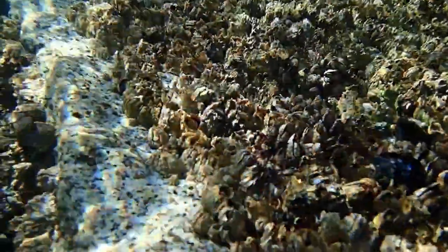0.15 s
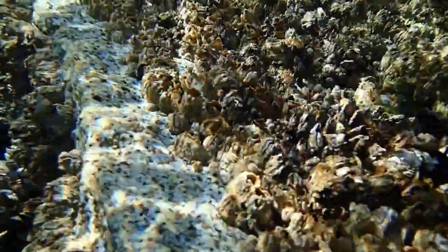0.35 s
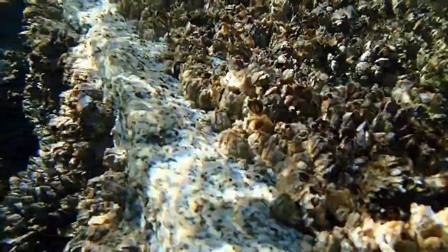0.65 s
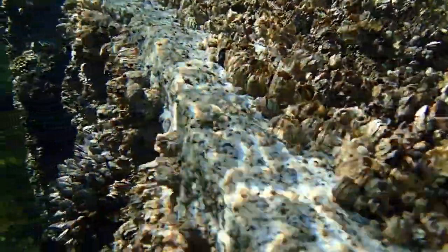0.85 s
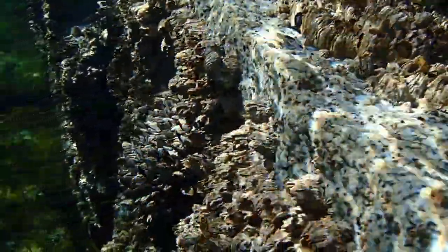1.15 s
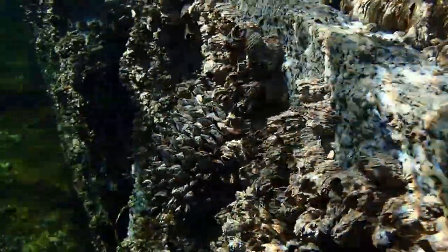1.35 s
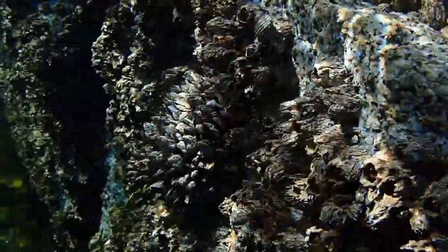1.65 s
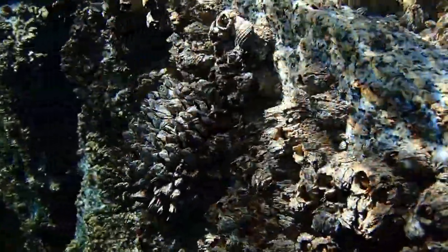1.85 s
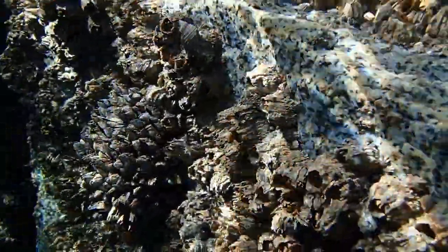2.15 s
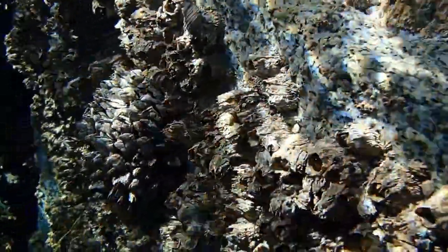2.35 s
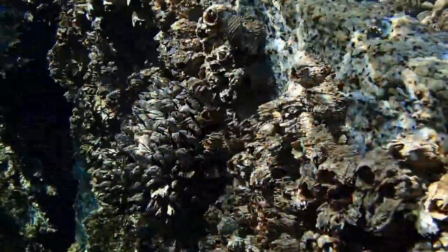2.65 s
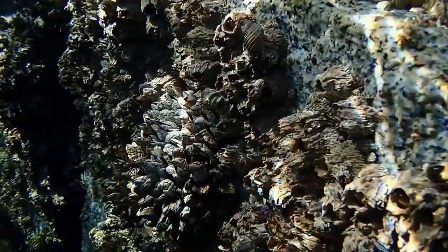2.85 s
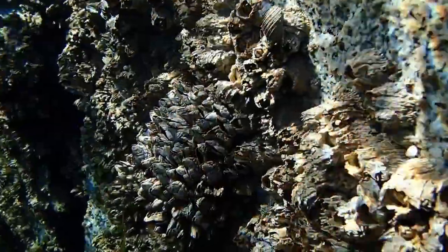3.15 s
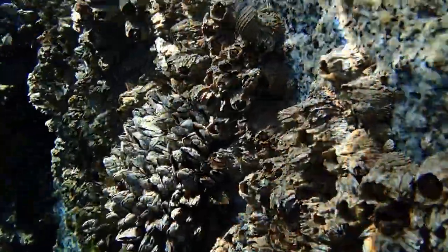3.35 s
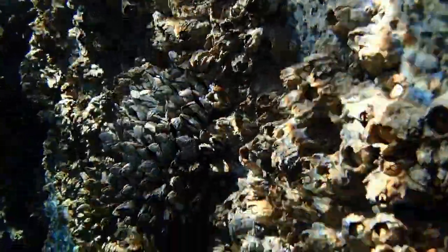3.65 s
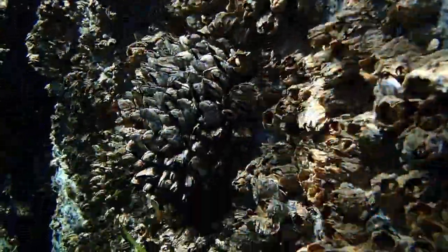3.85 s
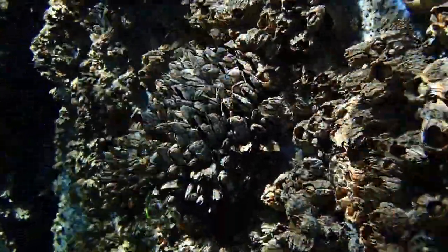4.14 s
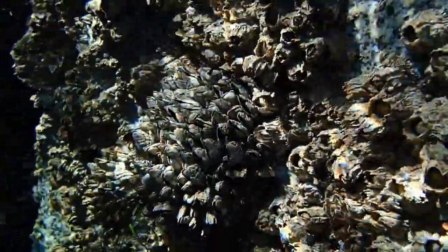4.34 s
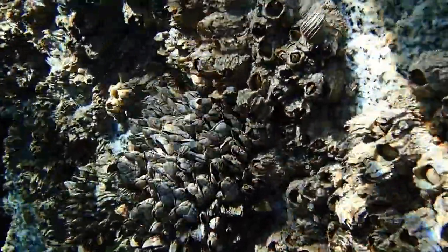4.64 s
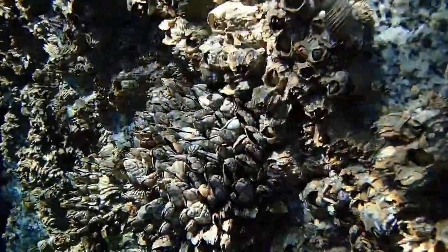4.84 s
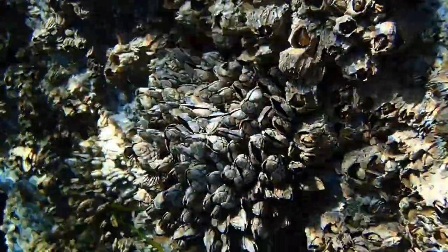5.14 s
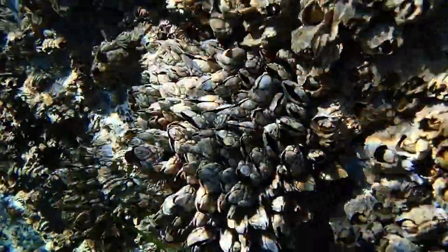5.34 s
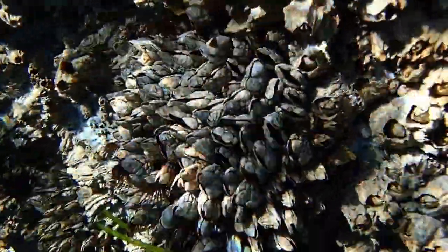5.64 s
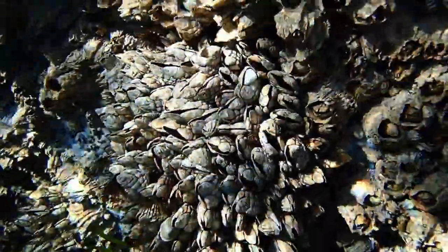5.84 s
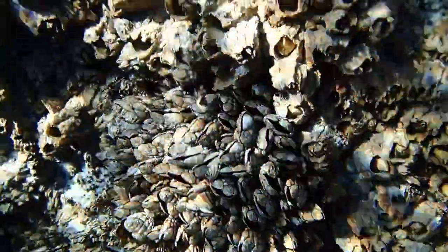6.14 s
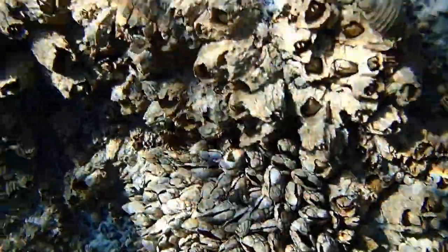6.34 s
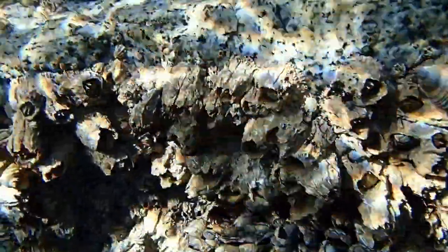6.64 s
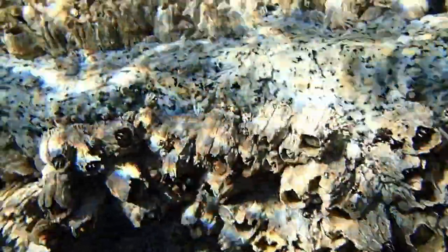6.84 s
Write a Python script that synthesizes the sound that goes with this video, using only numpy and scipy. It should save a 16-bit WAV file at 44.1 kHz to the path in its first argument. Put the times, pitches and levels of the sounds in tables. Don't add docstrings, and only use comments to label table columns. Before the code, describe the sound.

A drifting underwater camera picks up small dry clicks and dull knocks conducted through its case. The lens motor ticks evenly for the first second, joined by bubbles and a loud, crunching knock; a harsher double knock follows. Then scattered shell taps, double clicks, grit scrapes and rising bubble blips carry on over soft steady hiss, low sloshing surge and a few faint moans. Stereo, very close, muffled and dry.

```python
import sys
import numpy as np
from scipy import signal
from scipy.fft import rfft, irfft, next_fast_len
from scipy.io import wavfile
from scipy.ndimage import uniform_filter1d, map_coordinates

SR = 44100
rng = np.random.default_rng(int(sys.argv[2]) if len(sys.argv) > 2 else 0)


def wav_record(signal):
    frames = np.transpose(np.atleast_2d(signal))
    bounded = np.clip(frames, -1, 1)
    quanta = np.round(bounded * 32767).astype(np.int16)
    wavfile.write(sys.argv[1], SR, quanta)


def magnitude_from_level(level_db):
    exponent = np.asarray(level_db, float) / 20
    return 10 ** exponent


N = 308259

# freq_hz, level_db
HISS_SPECTRUM = [(30, -1), (300, 4.5), (1700, -2), (3600, -8), (4400, -9.5), (6000, -2), (9500, -6),
                 (15900, -7.5)]
# freq_hz, level_db
SLOSH_SPECTRUM = [(40, -13), (90, -5), (140, 2.5), (230, 0), (350, -2), (550, -10.5), (800, -53),
                  (1500, -22.5)]
# time_s, level_db
SURGE_LEVEL = [(0.0, -62), (0.37, -58), (0.58, -54), (1.71, -55.5), (2.22, -51.5), (2.33, -56.5),
               (2.76, -57), (3.29, -56), (3.5, -55), (3.79, -55.5), (4.3, -58.5), (4.88, -54), (5.45, -54),
               (5.94, -57), (6.64, -60.5), (6.99, -60.5)]
# time_s, pitch_hz, level_db
MOANS = [
    [(2.18, 210.3, -58), (2.306, 203.5, -45.5), (2.36, 200, -57)],
    [(4.66, 138.4, -65), (4.75, 138, -56), (5.12, 136.3, -56)],
    [(6.36, 140, -52), (6.44, 130, -71), (6.52, 129, -51)],
    [(6.78, 135.4, -59), (6.93, 130.5, -63), (7.05, 130, -64)],
]
# freq_hz, width_hz, level_db
BODY_PEAKS = [(450, 190, 1), (850, 264, 1.5), (1165, 350, 2), (2184, 200, -6), (2800, 220, -5)]
# freq_hz, width_hz, level_db
CAVITY_PEAKS = [(7530, 1070, -3.5), (8640, 430, -6)]
# freq_hz, width_hz, level_db
SERVO_PEAKS = [(1200, 280, -1.5), (2285, 120, -1), (3060, 130, 1.5), (3270, 200, -1.5), (5700, 1000, -7)]
# start_s, peak_db, pitch_hz
ROCK_SNAPS = [(1.058, -44, 7700), (1.348, -32.5, 7950), (1.385, -32.5, 7800), (1.3936, -36, 7700),
              (1.5096, -32, 8330), (1.606, -43, 7850), (1.731, -42, 5400), (1.7342, -30.5, 7900),
              (2.472, -48, 7500), (3.483, -41, 7300), (4.4762, -38, 7530), (4.8163, -40.5, 7700),
              (4.932, -43, 7500), (5.0634, -41, 7660), (5.0865, -42, 7440), (5.1005, -38, 7400),
              (5.2078, -45, 7500), (5.305, -45, 5460), (5.928, -38.5, 8100)]
# start_s, steps
FOCUS_RUNS = [
    (.0184, 4),
    (.3022, 10),
]
# freq_hz, level_db, t60_s, lag_s
CARRIAGE_MODES = [(1194, 5, 0.017, 0.00194), (1605, -1, 0.011, 0.00096), (1860, -4, 0.01, 0.00048),
                  (3310, -2, 0.013, 0.00119), (3700, 13, 0.0042, 0.0062), (4330, 4.5, 0.0058, 0.00058),
                  (5600, 7, 0.0022, 0.00045)]
WHINE_BURSTS = [(0, 1, 3), (6, 8, 10, 11), (13, 14, 16), (19, 21), (27, 28, 30, 32), (38, 40, 42),
                (44, 45, 46), (52, 54), (58, 59, 61, 63, 65), (68, 72), (75, 76), (81, 82, 84)]
# start_s, peak_db, pitch_hz
BUBBLES = [(.575, -51, 228), (0.633, -37, 385), (.66, -39, 393), (0.724, -35.5, 298), (0.968, -44, 119),
           (1.118, -45, 170), (1.356, -39, 347), (1.384, -41, 209), (1.512, -35, 424), (1.734, -33, 308),
           (2.262, -44, 167), (2.45, -55, 91), (3.352, -37.5, 274), (3.709, -42, 130), (3.527, -45.5, 214),
           (3.901, -31.5, 283), (3.987, -37, 184), (4.31, -37, 406), (4.331, -38, 395), (4.535, -39, 347),
           (4.736, -45, 317), (5.086, -40, 331), (5.342, -40, 131), (6.148, -33.5, 215),
           (6.601, -39.5, 314)]
# start_s, length_s, level_db, fizz_db
SCRAPE_STROKES = [(0.545, 0.021, -47.5, -70), (0.572, 0.023, -48, -66), (0.65, 0.064, -46.5, -72),
                  (1.118, 0.054, -49.5, -56), (1.339, 0.084, -52, -51.5), (2.459, 0.05, -42, -42.5),
                  (2.927, 0.025, -51, -69), (3.301, 0.07, -46.5, -58), (3.366, 0.058, -43, -57),
                  (3.42, 0.02, -52, -56), (3.463, 0.042, -45, -48), (4.306, 0.083, -55, -69),
                  (5.067, 0.045, -52, -53), (5.293, 0.074, -46, -56), (6.562, 0.056, -53, -64),
                  (6.693, 0.043, -50.5, -80)]
# start_s, peak_db, crack_db above the ring
SHELL_TAPS = [(0.904, -35, 0), (0.962, -35, -11), (1.2812, -24.5, -7), (1.359, -33.5, -18),
              (1.491, -45.5, 1.5), (1.5105, -32, -0.5), (1.6064, -37, -3), (1.6828, -29.5, -7.5),
              (1.7349, -25, -3), (2.5442, -36.5, -1.5), (3.4612, -36, -13), (5.9479, -35.5, -20),
              (6.5562, -43, -10)]
# start_s, peak_db, crack_db above the ring, touch_ahead_s
ROCKING_SHELLS = [(1.2512, -33.5, -23, 0.0094), (1.95, -30.5, -6, 0.0069), (2.3508, -29.5, -9.5, 0.0059),
                  (2.685, -31, -6.5, 0.0054), (2.951, -36, -11, 0.0063), (3.2858, -29.5, -10, 0.006),
                  (3.5533, -33, -11.5, 0.0083), (4.225, -27.5, -13, 0.013), (4.621, -32.5, -12, 0.0073),
                  (5.0903, -28, -15, 0.0097), (5.4897, -29, -11, 0.0097), (5.8251, -29, -16.5, .0114),
                  (6.086, -33, -14, 0.0045)]
# start_s, peak_db, pitch_hz
GRIT_TICKS = [(0.5384, -34.5, 1060), (0.681, -33.5, 1060), (1.479, -38, 905), (1.5194, -38, 1090),
              (1.8107, -37.5, 890), (2.08, -38, 1040), (2.464, -44, 1030), (2.4746, -32.5, 980),
              (2.4842, -41, 1050), (2.4989, -33, 1000), (2.75, -48, 1200), (2.879, -46, 1210),
              (2.907, -42, 1320), (3.154, -42, 1200), (3.392, -32.5, 1000), (3.412, -39, 915),
              (4.682, -44, 1330), (4.814, -51, 1140), (4.86, -47, 1310), (4.937, -41.5, 1144),
              (5.208, -49, 1070), (5.282, -44, 1220), (5.679, -47, 1140), (1.107, -48, 1160),
              (1.384, -45, 1240), (2.8119, -36, 900), (2.839, -37, 1040), (3.079, -37.5, 880),
              (3.366, -36, 830), (3.661, -50, 700), (3.6785, -36, 850), (4.4803, -36.5, 1140),
              (4.746, -35, 1130), (5.3436, -31, 920), (5.6126, -31.5, 930), (5.8153, -36, 1120),
              (6.282, -35, 960), (6.548, -32.5, 1130), (6.683, -38, 1120), (6.8829, -35.5, 1190)]
# start_s, peak_db, pitch_hz
SOFT_BUMPS = [(0.3338, -32, 496), (0.484, -35.5, 520), (.49, -36, 514), (0.804, -32.5, 530),
              (0.9664, -27, 370), (.58, -36.5, 476), (1.123, -37, 415), (1.9264, -42, 477),
              (3.05, -41.5, 420), (3.851, -47, 610), (1.98, -34.5, 524), (2.144, -31, 625),
              (2.1922, -37.5, 407), (2.2562, -30, 504), (2.4207, -35, 544), (2.5652, -38, 394),
              (2.679, -33, 377), (2.9357, -38, 380), (3.7082, -25.5, 450), (3.743, -32.5, 530),
              (3.8603, -37.5, 450), (4.025, -32, 507), (4.3458, -39.5, 445), (4.59, -33.5, 417),
              (5.3012, -37, 388), (5.9118, -32.5, 483), (6.0295, -40.5, 570), (6.1325, -37.5, 564),
              (6.6367, -33.5, 450)]
# freq_hz, level_db, t60_s
CRACK_MODES = [(1810, -0.5, 0.0098), (2010, -2, 0.028), (2720, 7, 0.0056), (3050, 5, 0.017),
               (4040, 4.5, 0.0099), (4160, 6.5, 0.0079), (5400, 5, 0.0065), (6300, -32, 0.0021),
               (7500, -10, .005)]
# start_s, case_push, wall_push (both of full scale)
KNOCK_CONTACTS = [
    (.88375, 2.69, -.77),
    (.88575, .74, -1.06),
    (.88826, .6, -.47),
    (1.61201, 1.82, -.44),
    (1.6135, -1.72, .94),
    (1.61833, .71, -.54),
    (1.63615, -.55, 1.01),
    (1.63744, -.49, -.72),
    (1.63874, 1.38, -.31),
]
# freq_hz, t60_s
CASE_MODES = [(538, .0082)]
# freq_hz, t60_s
WALL_MODES = [(600, .0143), (1077, .0212)]
GRIND_STARTS = [
    .8842,
    1.6118,
    1.6357,
]
# peak_db, hardness_db
GRINDS = [
    (-6.5, -20.5),
    (-4, -13.5),
    (-0.5, -13),
]
HOUSING_MODES = {"crack": [(1430, 1, 0.019), (2070, 5, 0.011), (3016, 4.5, 0.027), (3500, -5, 0.0051),
                 (4180, 5.5, 0.0075)], "shrill": [(5300, 8, 0.0023), (6300, -1, 0.0022),
                 (7880, 10, 0.0026)], "splinter": [(9700, 21, 0.0034), (11260, 24, 0.0081),
                 (12500, 26, 0.0034), (13700, 10, 0.003), (15700, -1, 0.0023)]}

GRIT_FOLLOWS, FIZZ_FOLLOWS = 0.7, 0.23
FRAME_S = .06672


def unit(x):
    return x / np.sqrt(np.mean(x ** 2) + 1e-20)


def filtered(x, response):
    m = next_fast_len(N + 8192)
    return irfft(rfft(x, m) * response(np.fft.rfftfreq(m, 1 / SR)), m)[..., :N]


def colour(points):
    f, db = np.transpose(points)
    return lambda hz: magnitude_from_level(np.interp(np.log(hz + 1), np.log(f), db))


def resonances(modes):
    def response(f):
        total = 0
        for k, (centre, width, db) in enumerate(modes):
            damping = 1j * f * width
            total = total + (-1) ** k * magnitude_from_level(db) * damping / (centre ** 2 - f ** 2 + damping)
        return total
    return response


def twice(modes):
    once = resonances(modes)
    return lambda f: once(f) ** 2


def pair(alike, spiky_db, rate):
    grain = map_coordinates(rng.standard_normal(int(N * rate / SR) + 4), [np.arange(N) * rate / SR])
    a, b = rng.standard_normal((2, N)) * magnitude_from_level(spiky_db * np.clip(grain, -3, 1.8))
    turn = np.arccos(np.clip(alike, -1, 1)) / 2
    return np.array([np.cos(turn) * a + np.sin(turn) * b, np.cos(turn) * a - np.sin(turn) * b])


def silence():
    return np.zeros((2, N + SR))


def add(out, s, hz, db, t60, rise, skew=0., glide=0., phase=0., carrier=None):
    t = np.arange(int(min(max(t60, .002), .12) * SR)) / SR
    phase_skew, level_skew = skew * rng.standard_normal(2)
    turn = 2 * np.pi * hz * t * (1 + glide * t / max(t60, .002)) + phase
    turn = turn + np.array([[phase_skew], [-phase_skew]])
    tilt_db = 3 * np.array([[level_skew], [-level_skew]])
    ring = magnitude_from_level(db - 60 * t / t60 + tilt_db) * (1 - np.exp(-t / rise)) * np.sin(turn)
    if carrier is not None:
        ring = ring[:, :carrier.shape[1]] * carrier[:, :len(t)]
    i = max(round(s * SR), 0)
    out[:, i:i + ring.shape[1]] += ring


def spark(out, s, db, t60):
    noise = rng.standard_normal((3, int(.008 * SR)))
    band = signal.butter(2, [1700, 7000], "bandpass", fs=SR)
    bright = signal.lfilter(*band, noise[0] + 0.88 * noise[1:])
    add(out, s, 0, db, t60, .0002, phase=np.pi / 2, carrier=bright)


def surge():
    surge_db = np.interp(np.arange(N) / SR, *np.transpose(SURGE_LEVEL))
    return surge_db, surge_db - surge_db.mean()


def hiss():
    return magnitude_from_level(-51.5) * unit(filtered(rng.standard_normal((2, N)), colour(HISS_SPECTRUM)))


def servo():
    return magnitude_from_level(-57.5) * unit(filtered(pair(1.0, spiky_db=2.5, rate=55), twice(SERVO_PEAKS)))


def water():
    surge_db, swing_db = surge()
    slosh = unit(filtered(pair(1.0, spiky_db=3.5, rate=38), colour(SLOSH_SPECTRUM)))
    grit = unit(filtered(pair(0.95, spiky_db=5.5, rate=150), twice(BODY_PEAKS)))
    fizz = unit(filtered(pair(0.041, spiky_db=1.0, rate=110), twice(CAVITY_PEAKS)))
    out = magnitude_from_level(surge_db + 2) * slosh
    out += magnitude_from_level(-60.5 + GRIT_FOLLOWS * swing_db) * grit
    return out + magnitude_from_level(-56 + FIZZ_FOLLOWS * swing_db) * fizz


def moans():
    t, out = np.arange(N) / SR, np.zeros(N)
    for rows in MOANS:
        s, hz, db = np.transpose(rows)
        fade = np.clip(np.minimum(t - s[0], s[-1] - t) / 0.015, 0, 1)
        turn = 2 * np.pi * np.cumsum(np.interp(t, s, hz)) / SR
        out += fade * magnitude_from_level(np.interp(t, s, db) + 1.5) * np.sin(turn)
    return out


def crackle():
    count = int(90 * N / SR)
    where, size, sign = rng.uniform(size=(count, 3)).T
    strength = magnitude_from_level(-6 * np.log(size + .01)) * np.sign(sign - .5)
    blows = np.bincount((where * N).astype(int), strength, N)
    swing_db = surge()[1]
    return magnitude_from_level(-59 + GRIT_FOLLOWS * swing_db) * unit(filtered(blows, twice(BODY_PEAKS)))


def snaps():
    out = silence()
    for s, db, hz in ROCK_SNAPS:
        add(out, s, hz, db, .014, .001, skew=0.4)
        add(out, s, hz * rng.uniform(0.87, 1.1), db + 12.5, .006, .0003, skew=0.92)
        ahead_s = rng.uniform(.003, 0.0085)
        add(out, s - ahead_s, hz * rng.normal(1, 0.0098), db + 4, .014, .001, skew=0.86)
    return out[:, :N]


def focus_steps():
    out = silence()
    starts = np.concatenate([s + FRAME_S * np.arange(steps) for s, steps in FOCUS_RUNS])
    stops = starts + .0131 + .0007 * rng.uniform(-0.86, 1, len(starts))
    for s in np.concatenate([starts, stops]):
        bright_db = -34.5 + 8 * (s in stops) - (s == stops[-1])
        spark(out, s, bright_db - 3, 0.0034)
        for hz, level, t60, lag in CARRIAGE_MODES:
            blow_db = -33 if hz < 2500 else bright_db
            add(out, s + lag, hz, level + blow_db, t60, 0.0004 + lag, skew=0.1)
    return out[:, :N]


def stabiliser_whine():
    out = silence()
    t = np.arange(int(.024 * SR)) / SR
    fade = np.clip(np.minimum(t, t[::-1]) / .001, 0, 1)
    for s in 1.341 + FRAME_S * np.concatenate(WHINE_BURSTS):
        tone = np.sin(2 * np.pi * rng.normal(4807, 4) * t + [[.2], [-.2]]) * fade
        i = round(s * SR)
        out[:, i:i + len(t)] += magnitude_from_level(-56.5 + rng.normal(0, 1.0)) * tone
    return out[:, :N]


def pops():
    out = silence()
    freed = [(s, db - 8, hz * 0.68) for s, db, hz in SOFT_BUMPS]
    for s, db, hz in BUBBLES + freed:
        add(out, s - .002, hz, db + 11.5, 9 / hz, .004, skew=0.028, glide=0.16)
    return out[:, :N]


def scrapes():
    t, body, fizz = np.arange(N) / SR, np.zeros(N), np.zeros(N)
    for s, length, db, fizz_db in SCRAPE_STROKES:
        stroke = np.clip(np.minimum((t - s) / 0.0051, (s + length - t) / 0.0074), 0, 1)
        body += magnitude_from_level(db) * stroke
        fizz += magnitude_from_level(fizz_db) * stroke
    cavities = [(3020, 210, 2.0), (4660, 530, -6.5)] + CAVITY_PEAKS + [(11400, 980, -14)]
    out = body * unit(filtered(pair(1.0, spiky_db=-0.5, rate=230), twice(BODY_PEAKS)))
    return out + fizz * unit(filtered(pair(0.09, spiky_db=2.0, rate=360), resonances(cavities)))


def contacts():
    sharp = [(s, db, 1130 * rng.normal(1, 0.022), crack_db)
             for s, db, crack_db, *_ in SHELL_TAPS + ROCKING_SHELLS]
    touches = [(s - ahead, -39 + 0.44 * (db + 38.5), 1032) for s, db, _, ahead in ROCKING_SHELLS]
    return sharp + [(*soft, -31.5) for soft in touches + GRIT_TICKS + SOFT_BUMPS]


def clicks():
    out = silence()
    neighbours = ((260, -6.5), (480, -1.0), (820, 1.0), (1280, 1.0), (1500, -15.5))  # freq_hz, level_db
    for s, db, hz, crack_db in contacts():
        add(out, s, hz, db + 5.0, .018, .0007, skew=0.038)
        for near_hz, level in neighbours:
            near_db = db + level + 2.0 * rng.standard_normal()
            add(out, s + rng.uniform(0, 0.0014), near_hz, near_db, .012, .001, skew=0.05)
        spark(out, s - .001, db + crack_db + 3.0, 0.011)
        add(out, s, 2150 * rng.normal(1, 0.024), db - 6, .008, .0005, skew=0.31)
        for mode_hz, level, t60 in CRACK_MODES:
            mode_db = db + crack_db + level + rng.normal(0, 1.5)
            add(out, s - .001, mode_hz * rng.normal(1, 0.044), mode_db, t60, .0003, skew=0.2)
    return out[:, :N]


def push_case(out):
    for s, case, wall in KNOCK_CONTACTS:
        for push, modes in ((case * 1.1, CASE_MODES), (wall * 1.12, WALL_MODES)):
            for hz, t60 in modes:
                push_db = 20 * np.log10(abs(push))
                add(out, s, hz, push_db, t60, .0005, skew=.02, phase=np.pi * (push > 0))


def grind(out):
    for s, (db, hard_db) in zip(GRIND_STARTS, GRINDS):
        for again in np.linspace(0, .002, num=4):
            spark(out, s + again, db + hard_db + 5.5, 0.0038)
        group_levels = {"crack": hard_db, "shrill": -6.5, "splinter": -2 + 2.67 * hard_db}
        for group, group_db in group_levels.items():
            for hz, level, t60 in HOUSING_MODES[group]:
                for again in np.linspace(.0002, .0024, num=5) + rng.uniform(0, .0006, size=5):
                    mode_hz = hz * rng.normal(1, 0.029)
                    add(out, s + again, mode_hz, db + group_db + level, t60, .0003, skew=0.65)


def knocks():
    out = silence()
    push_case(out)
    grind(out)
    return out[:, :N] * magnitude_from_level([[.8], [-.8]])


def scene():
    background = servo() + water() + moans() + crackle() + snaps()
    motors = focus_steps() + stabiliser_whine()
    return background + motors + pops() + scrapes() + clicks() + knocks()


def ports(x):
    lag_s = np.array([[2], [0]]) / SR

    def response(hz):
        highpass = 1j * hz / (70 + 1j * hz)
        return (hz < 15860) * highpass * np.exp(-2j * np.pi * hz * lag_s)
    return filtered(x, response)


def ducked(x):
    loud = np.roll(np.abs(x).max(0) > .5, round(.004 * SR))
    last_loud = np.maximum.accumulate(np.where(loud, np.arange(N), -9 * SR))
    since_s = (np.arange(N) - last_loud) / SR
    return x * magnitude_from_level(-uniform_filter1d(9 * np.exp(-since_s / 0.048), size=200))


def band_limit(x):
    return signal.sosfilt(signal.butter(12, 15920, fs=SR, output="sos"), x)


def record(dry):
    x = ducked(ports(dry + hiss()))
    mix = np.clip(x - .0004, -1, 1)
    return band_limit(mix)


dry = scene()
out = record(dry)
wav_record(out)
```